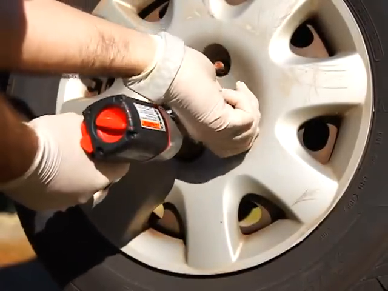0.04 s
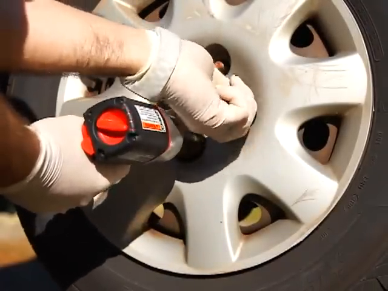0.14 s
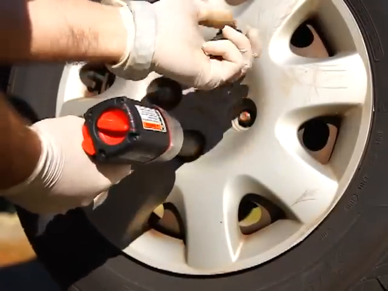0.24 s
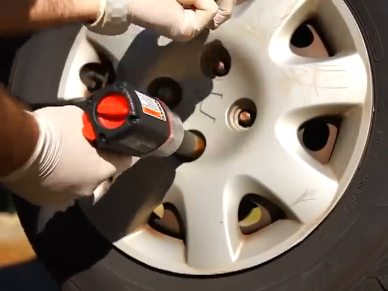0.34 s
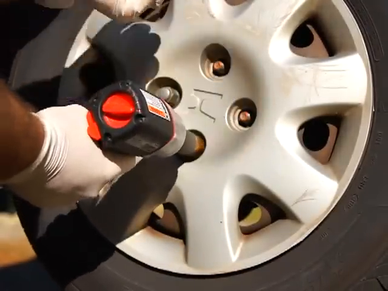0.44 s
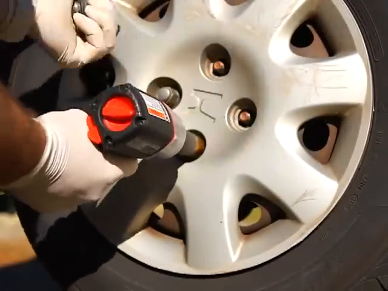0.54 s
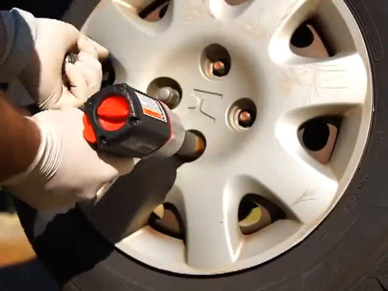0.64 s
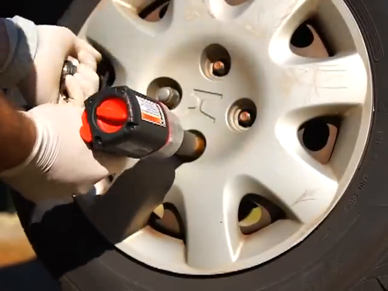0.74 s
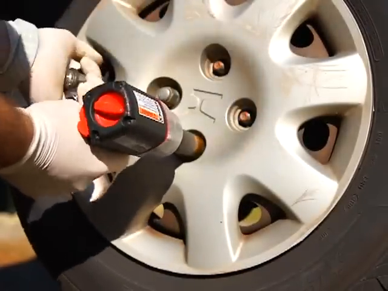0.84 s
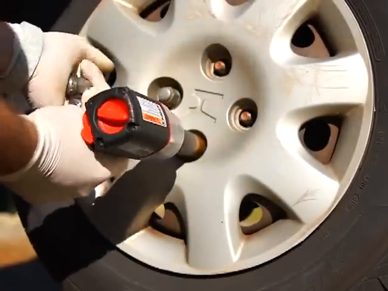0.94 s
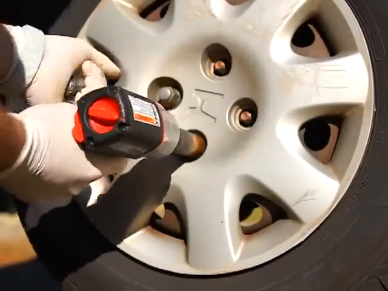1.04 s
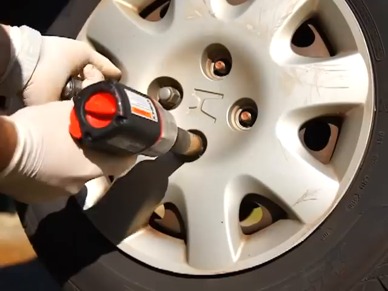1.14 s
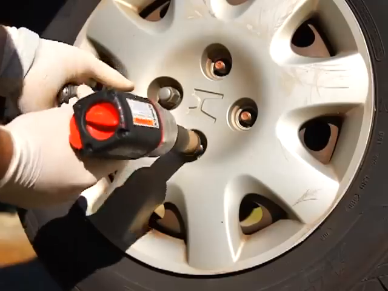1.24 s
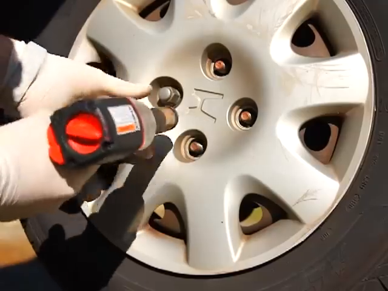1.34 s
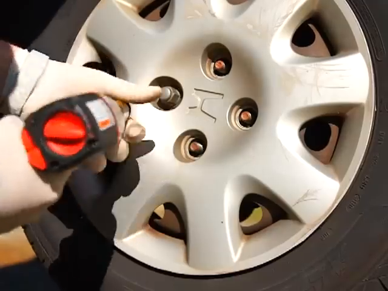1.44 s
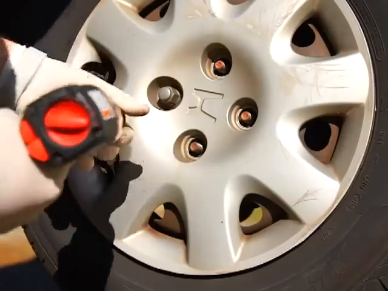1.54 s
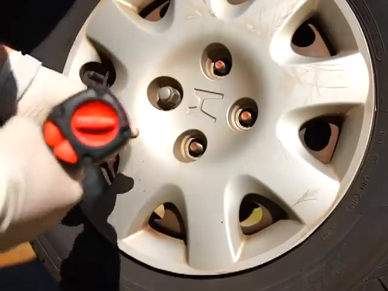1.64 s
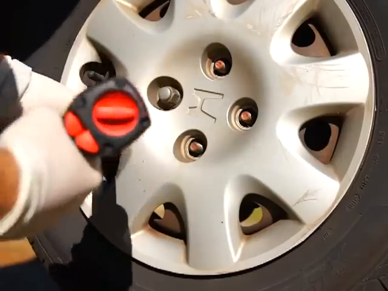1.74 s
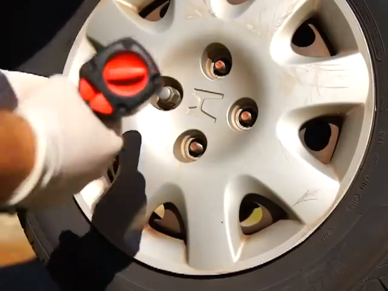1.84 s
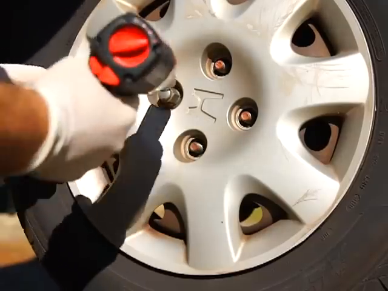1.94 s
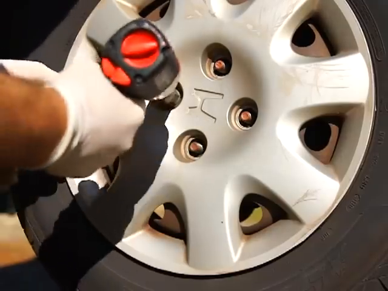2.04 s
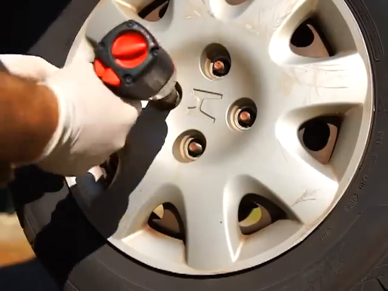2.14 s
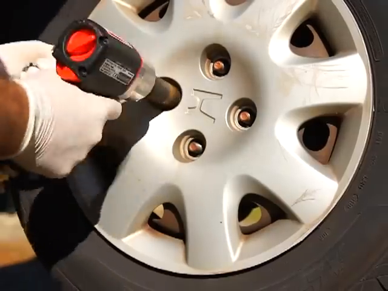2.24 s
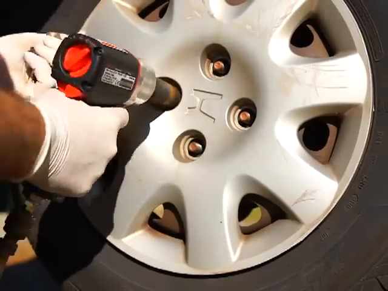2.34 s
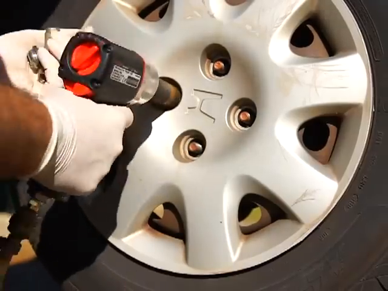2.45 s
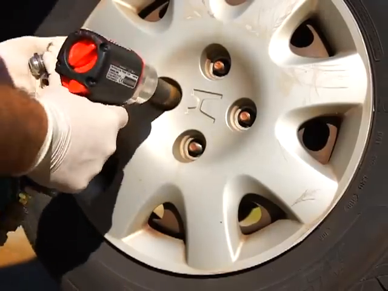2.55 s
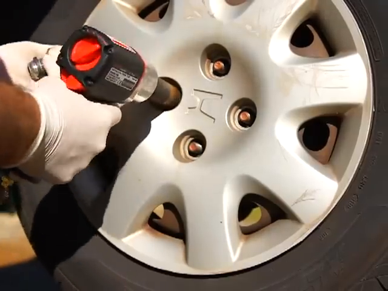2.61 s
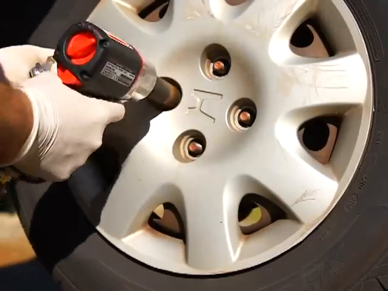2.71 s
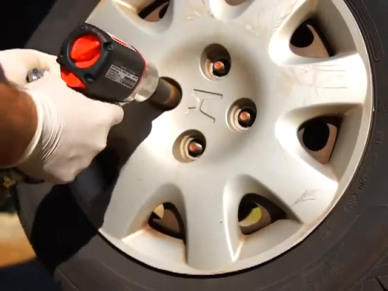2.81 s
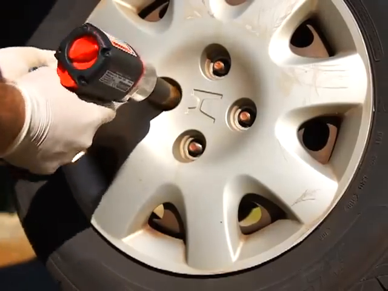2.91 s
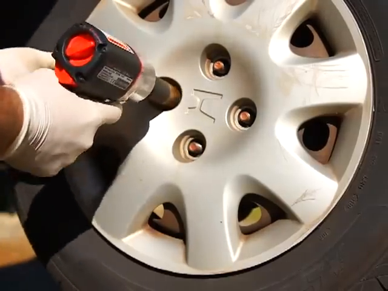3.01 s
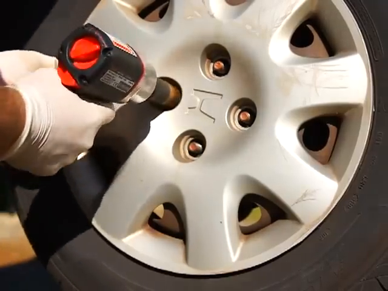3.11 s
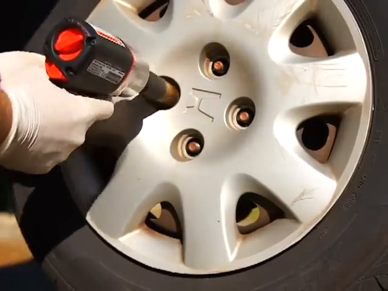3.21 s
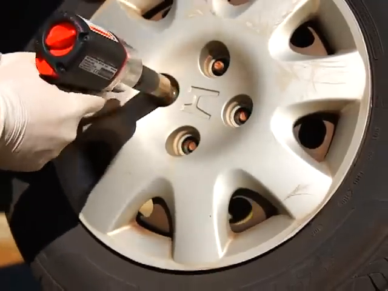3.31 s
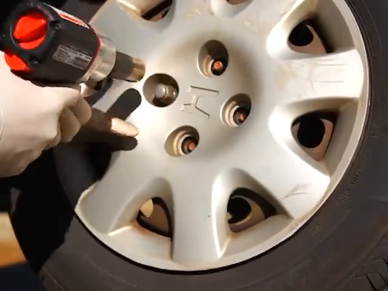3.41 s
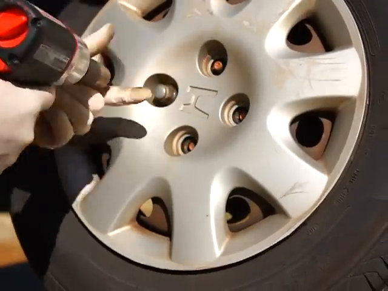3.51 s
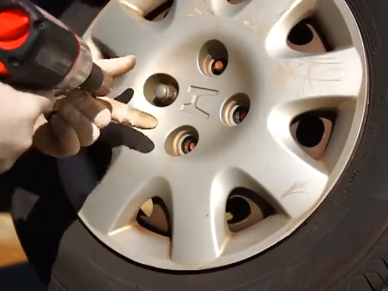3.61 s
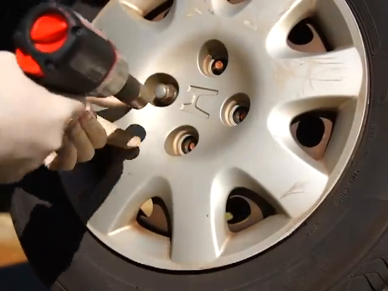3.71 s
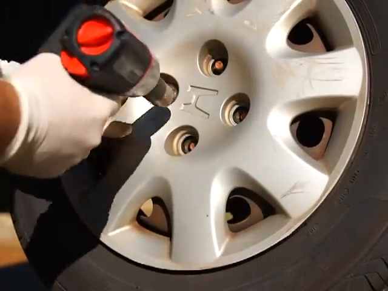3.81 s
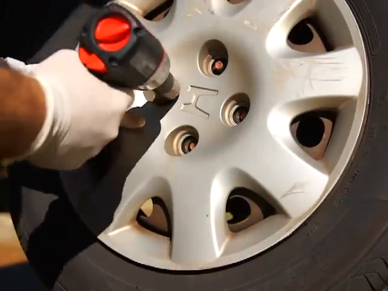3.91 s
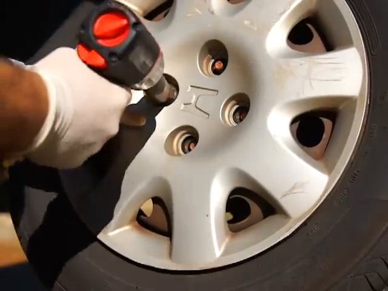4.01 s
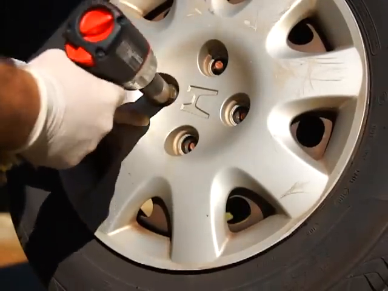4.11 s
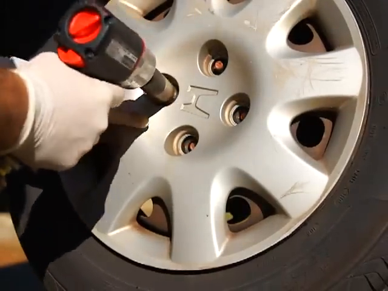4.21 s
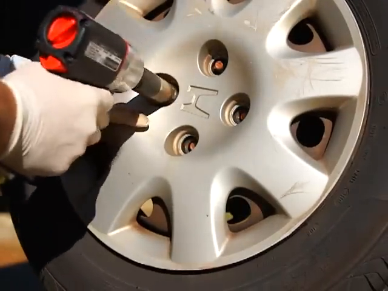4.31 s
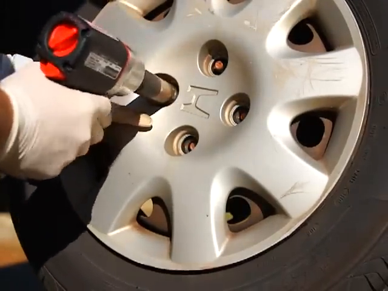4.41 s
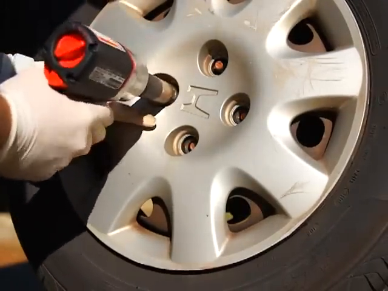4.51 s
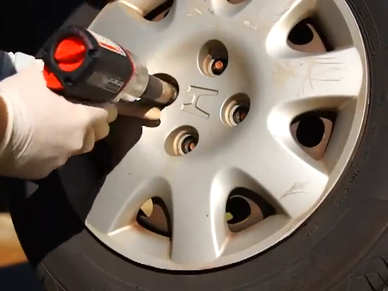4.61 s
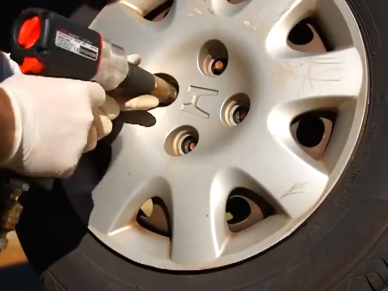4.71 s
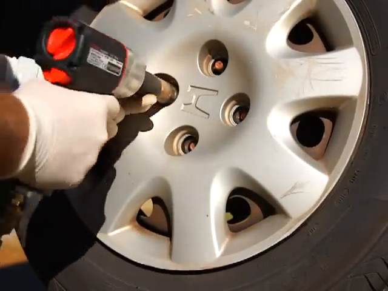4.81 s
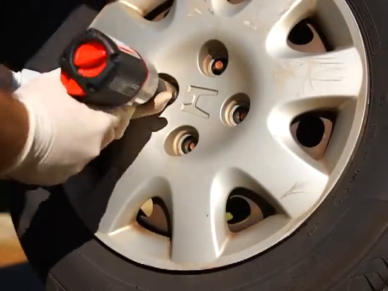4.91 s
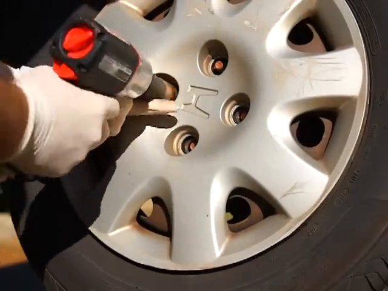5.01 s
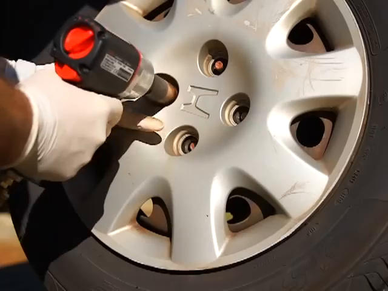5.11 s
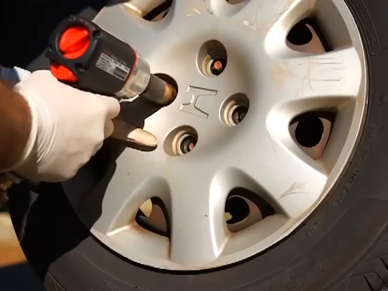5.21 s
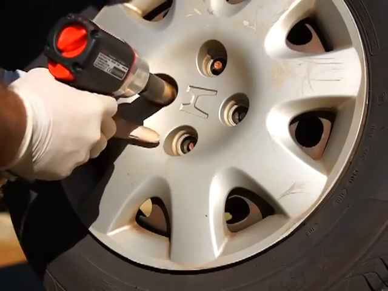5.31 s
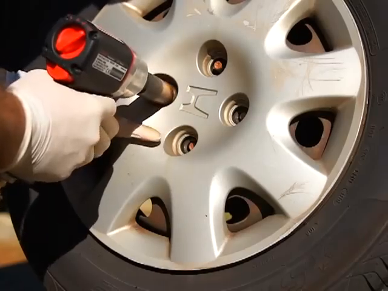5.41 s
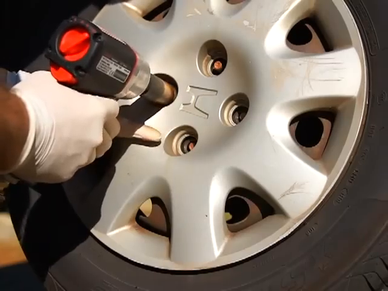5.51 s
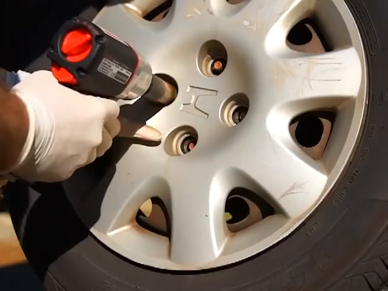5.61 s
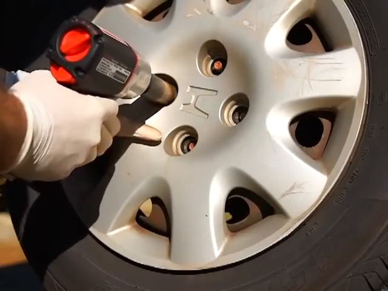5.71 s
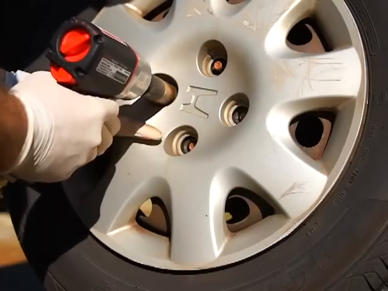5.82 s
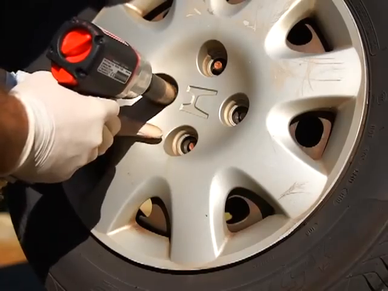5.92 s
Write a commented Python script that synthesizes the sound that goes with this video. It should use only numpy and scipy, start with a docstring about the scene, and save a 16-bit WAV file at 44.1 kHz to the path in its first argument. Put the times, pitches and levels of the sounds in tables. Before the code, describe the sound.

A few light metal clinks open the sound, close up in a garage with a slight echo. At about 0.8 seconds an air impact wrench hammers at a wheel nut in two short, rattling bursts with puffs of exhaust, then runs down with a falling whine until about 1.6 seconds. The socket and loose nuts clink, knock and scrape against the wheel from 1.3 to 2.5 seconds. Three more loud, quick bursts come between 2.6 and 3.3 seconds, the last with a brief rising whine. A tiny squeak follows near 3.4 seconds, then scattered lighter clicks, ringing taps and faint rubbing as the socket is fitted again. Air hisses softly at the trigger around 4.5 seconds and again from 5.3 seconds, growing louder. At about 5.7 seconds the wrench gives one brief, weaker blip with a couple of blows, followed by a few clinks.

```python
"""A few light clinks, then an air wrench hammers at wheel nuts in short, rattling bursts.
Its vane motor puffs out air, stalls under the hammer blows and runs down with a falling whine.
Between bursts the socket and nuts knock and scrape on the wheel, and air hisses at the valve.
It is all heard in a garage, through a small camera whose housing weakens a few narrow pitch bands."""
import sys
import numpy as np
from scipy import signal
from scipy.fft import rfft, irfft, next_fast_len
from scipy.io import wavfile
from scipy.ndimage import uniform_filter1d, map_coordinates

SR = 44100
rng = np.random.default_rng(int(sys.argv[2]) if len(sys.argv) > 2 else 0)


def put_to_file(sound):
    """Save the sound as 16-bit audio at rate SR, in the file named by the first command-line argument."""
    columns = np.atleast_2d(sound).T  # one column per channel
    safe = np.clip(columns, -1, 1)
    whole_steps = np.round(safe * 32767)
    wavfile.write(sys.argv[1], SR, whole_steps.astype(np.int16))


N = 262395

# The hammer hitting the anvil inside the wrench. Each row: start in seconds, level in dB.
BLOWS = [(0.7709, -8), (0.7922, -1), (0.807, -3), (0.8401, -3.5), (0.8735, -2), (0.9097, -1.5),
         (1.0218, -1.5), (1.0384, -3.5), (1.073, -12), (1.1038, -1), (2.6278, -2), (2.6582, 2), (2.6948, 1),
         (2.7286, 0), (2.7664, -0.5), (2.7974, -4.5), (2.9101, -12), (2.9257, 2), (2.9387, -3.5),
         (2.972, -2.5), (3.0082, 1), (3.174, -5.5), (3.1888, -0.5), (3.2289, -9.5), (3.263, -0.5),
         (5.686, -9), (5.7351, -0.5)]
# The wheel's ringing tones. Each row: pitch in Hz, level in dB, t60 (seconds to fade by 60 dB).
WHEEL_TONES = [(385, -3.5, 0.22), (834, -9.5, 0.16), (1032, -10.5, 0.17), (1674, -2, 0.116),
               (1855, -2, 0.057), (2647, -6.5, 0.21), (2840, -11.5, 0.016), (3044, -20.5, 0.084),
               (3450, 3, 0.3), (3970, -2.5, 0.046), (4230, 3, 0.085), (5330, -9, 0.15), (6083, -24, 0.07),
               (7500, -14, 0.036), (7540, -6, 0.017), (8160, -5, 0.013), (3310, -7.5, 0.314),
               (9250, -13.5, 0.1)]
# One list per free spin of the motor. Each row: time in seconds, vane rate in Hz, whine level in dB.
FREE_SPINS = [
    [(1.05, 390, -17.5), (1.08, 446.4, -14.5), (1.115, 609, -20), (1.16, 489.4, -20.5), (1.22, 390, -19),
     (1.3, 289, -27), (1.38, 217, -27), (1.46, 155.4, -31), (1.56, 110.8, -44.5)],
    [(3.19, 370, -29.5), (3.21, 408, -16.5), (3.24, 500, -21.5), (3.285, 620, -28)],
]


def impacts():
    """Hard, bright hammer blows, and knocks of the socket and nuts that each add a small ping."""
    # Each row: start in seconds, treble level in dB, middle and thud in dB over the treble,
    # t60 in seconds, ping pitch in Hz, ping strength in dB.
    knocks = [(0.1018, -42, 5, -11, 0.076, 1760, -5.5), (0.39, -20, -22, -34, 0.11, 4210, -3),
              (0.4219, -17, -21.5, -25, 0.065, 4190, -4.5), (0.4678, -17, -18, -26, 0.025, 5200, -5),
              (0.617, -38.5, -17, -26, 0.052, 3130, 3.5), (1.3014, -12, -14, -18, 0.073, 5330, -1.5),
              (1.3535, -16.5, -9, -16, 0.07, 4227, -3), (1.3823, -15.5, -9, -18, 0.07, 1662, -3),
              (1.4129, -14, -5, -18, 0.061, 4030, 0), (1.4461, -20, -4.5, -22, 0.065, 5300, 0.5),
              (1.515, -14, -16.5, -33, 0.21, 4350, -1.5), (1.5567, -3, -12.5, -31, 0.044, 4640, -9.5),
              (1.5973, -17.5, -12, -34, 0.039, 1895, -2), (1.6375, -23.5, -13.5, -32, 0.054, 1560, -2),
              (1.6527, -17.5, -18, -39, 0.05, 4720, 0), (1.6912, -15.5, -15.5, -40, 0.048, 1633, -2.5),
              (1.7508, -26.5, -25, -39, 0.057, 5480, -2), (2.104, -25, -14, -37, 0.14, 1885, -6),
              (2.1506, -7, -8.5, -21, 0.16, 2710, 3), (2.1946, -10.5, -11, -17.5, 0.11, 2600, 0.5),
              (2.3016, -31.5, -8, -8, 0.21, 4200, -8), (2.3381, -4.5, -6, -9.5, 0.054, 1570, -5),
              (2.4505, -31.5, -6, -7, 0.1, 3980, 0), (2.4643, -18, -9, -15, 0.045, 4120, -2),
              (2.5361, -55, 11.5, -3, 0.07, 2570, 5), (3.3282, -15, -15, -13, 0.12, 4100, -4),
              (3.3611, -14.5, -11, -13, 0.11, 4400, -2.5), (3.3965, -14, -6, -7, 0.14, 1500, -0.5),
              (3.4477, -26, -12, 6, 0.038, 1920, -0.5), (3.5943, -20, -12, -15, 0.066, 3910, -2.5),
              (3.6453, -32, 0, -11, 0.1, 1880, -2), (3.7742, -29, -17, -30, 0.039, 4340, -4),
              (3.8878, -16.5, -10, -24, 0.032, 1830, -0.5), (4.0191, -17, -3, -17, 0.074, 2860, 3),
              (4.1125, -11.5, -15.5, -31, 0.073, 2848, -3.5), (4.2057, -25.5, 1.5, -13, 0.21, 1900, -3),
              (4.2467, -21.5, -2, -5.5, 0.11, 2856, 4), (4.345, -40.5, 7, -21, 0.039, 1520, 6),
              (4.4933, -35, 1, 2, 0.036, 2640, 0.5), (4.6614, -43, 2.5, -6, 0.042, 1660, 3.5),
              (4.7648, -27.5, -4, -21.5, 0.098, 2850, -1), (4.841, -37, 1.5, 7, 0.11, 2840, -1),
              (4.8628, -32.5, -4, -5, 0.095, 3160, -0.5), (4.954, -38.5, 7, 14, 0.12, 1970, -7),
              (4.9762, -46.5, 12, 16, 0.083, 1820, -5), (5.0075, -19.5, -5, -15, 0.067, 3080, -1),
              (5.1313, -21, 1, -12, 0.11, 1583, -3.5), (5.1737, -29, -13, -35, 0.21, 3930, 3),
              (5.2716, -28.5, -6, -31, 0.062, 1786, 0), (5.3508, -30, -0.5, 1, 0.054, 2040, 2.5),
              (5.66, -19, -8, -7.5, 0.051, 2890, 0.5), (5.8008, -18, -17, -11, 0.093, 2980, 2),
              (5.8257, -12, -27, -28, 0.065, 4240, -3), (5.8472, -17.5, -10, -28, 0.13, 2920, -0.5),
              (5.8824, -20, -11, -15, 0.18, 2650, -0.5)]
    out, t = np.zeros(N + SR), np.arange(SR // 4) / SR
    for start, db in BLOWS:
        blow = strike(db - 5.5, db - 16, db - 30, t60=0.18, ring_db=-11, crack=5.6, rise_s=0.00034)
        out[round(start * SR):][:len(t)] += blow
    for start, db, middle_db, thud_db, t60, hz, ping_db in knocks:
        db += 5.5
        ping_gain = amp(db + max(middle_db, 0) + ping_db - 6.5 - 60 * t / 0.035)
        ping = ping_gain * (1 - np.exp(-t / 0.0014)) * np.sin(2 * np.pi * hz * t)
        knock = strike(db, db + middle_db - 2.5, db + thud_db - 10.5, t60,
                       ring_db=-19, crack=1.05, rise_s=0.00089)
        out[round(start * SR):][:len(t)] += knock + ping
    return out[:N]


def strike(treble_db, middle_db, thud_db, t60, ring_db, crack, rise_s):
    """Metal hits metal: a crack, an uneven rattle that dulls as it dies, and the wheel ringing."""
    t = np.arange(SR // 4) / SR
    ring = sum(amp(db + rng.normal(0, 3.5) - 60 * t / min(decay, 1.7 * t60))
               * np.sin(2 * np.pi * hz * rng.normal(1, .03) * t) for hz, db, decay in WHEEL_TONES)
    chatter = amp(3.5 * np.repeat(rng.standard_normal(len(t) // 105), 105))
    dull = uniform_filter1d(rng.standard_normal(len(t)), size=4) * chatter * amp(-60 * t / t60)
    bright_gain = 0.1 * chatter * amp(-60 * t / (.5 * t60)) + crack * amp(-60 * t / 0.014)
    bright = bright_gain * rng.standard_normal(len(t))
    hit = (amp(ring_db) * ring + 1.43 * dull + bright) * (1 - np.exp(-t / rise_s))
    colour = [(90, thud_db - 26.5), (190, thud_db - 1), (300, thud_db + 18.5), (500, thud_db + 16.5),
              (800, middle_db + 4.5), (2000, middle_db + 2),
              (2800, treble_db - 8.0), (6000, treble_db - 9), (11000, treble_db - 13.5)]
    gains = amp(along(colour, np.fft.rfftfreq(len(t), 1 / SR)))
    fade_out = np.cos(np.pi / 2 * t / t[-1]) ** 2
    return irfft(rfft(hit) * gains, len(t)) * fade_out


def motor():
    """Exhaust and casing roar swell as the rotor leaves a stall, and soften when it spins free."""
    # The tone of the exhaust and of the casing. Each row: frequency in Hz, level in dB.
    puff_colour = [(60, -27), (130, -59), (220, -10.5), (320, -4), (450, 0.5), (600, -7.5), (900, -9),
                   (2000, -36.5)]
    roar_colour = [(300, -37), (600, -6), (800, 2.5), (960, 2), (1070, 9), (1180, -2), (1300, -4),
                   (1800, -7), (2300, -16), (4000, -39)]
    puff, roar, jet = trigger_pulls()
    t = np.arange(N) / SR
    free = sum((t > spin[0][0]) & (t < spin[-1][0]) for spin in FREE_SPINS)
    free = uniform_filter1d(1. * free, SR // 50)
    blow_times = np.array(BLOWS)[:, 0]
    speed = rotor_speed(blow_times)
    vane_hz = 400 * speed ** .3 * (1 + .1 * wobble(40))
    vanes = np.sin(2 * np.pi * np.cumsum(vane_hz) / SR)
    buzz = vanes * amp(3 * wobble(60)) * (seconds_since(blow_times) < .04)
    exhaust = speed * (0.8 * hiss(puff_colour, 1.5, 50) + 0.83 * buzz)
    casing = 0.76 * speed ** 0.2 * hiss(roar_colour, 2.74, 60) * (1 + 0.39 * vanes)
    return amp(-11 * free) * puff * exhaust + amp(-3 * free) * roar * casing + air_jet(jet * speed ** 0.084)


def trigger_pulls():
    """Gains of puff, roar and jet: each pull rises, sags while held, then drops to a run-down."""
    # Each row: start and hold time in seconds, puff, roar and jet levels in dB,
    # run-down level in dB relative to the hold, its base fading speed in dB per second.
    pulls = [(-.1, 0.096, -14.5, -28.5, -42, -40, 100), (0.76, .155, -11, -14, -17, -10, 140),
             (1.006, .12, -11.5, -16, -20, -2, 59.5), (2.617, 0.16, -13, -19.5, -18, -13.5, 71),
             (2.898, 0.1, -8, -18, -19, -13.5, 69), (3.164, 0.13, -9, -13.5, -19, -15, 46.5),
             (5.653, 0.11, -21, -27, -45, -32, 100), (5.718, 0.087, -18, -20, -33.5, -17.5, -5)]
    # Level lost while held, in dB per second, for puff, roar and jet.
    sag_rates = [64, 4, 7.5]
    sag = np.array(sag_rates)[:, None]
    offset_db, fade_scale = np.array([[-5], [8], [-4]]), np.array([[0.75], [1.38], [0.49]])
    lead_s = np.array([[0], [0], [0.012]])  # air reaches the jet before the rotor turns
    attack_s, release_s, stop_s = 0.013, 0.011, .48
    t, out = np.arange(N) / SR, np.zeros((3, N))
    for start, held, *layers_db, down_db, fade_rate in pulls:
        on, off = np.clip(t - start, 0, held), np.maximum(t - start - held, 0)
        rise = np.clip((t - start + lead_s) / (attack_s + lead_s), 0, 1) ** 2
        cut = np.exp(-off / release_s)
        stop = np.clip((stop_s - off) / release_s, 0, 1)
        rundown = amp(down_db + offset_db - fade_scale * fade_rate * off) * stop
        out += amp(np.array(layers_db)[:, None] - sag * on) * rise * (cut + (1 - cut) * rundown)
    return out


def rotor_speed(blow_times):
    """Share of full speed: blows stall the rotor, but the first of a burst only takes up slack."""
    stall_depth, stall_s = .93, .016
    stalls = blow_times[1:][np.diff(blow_times) < .1]
    return 1 - stall_depth * np.exp(-(seconds_since(stalls) / stall_s) ** 4)


def air_jet(gain):
    """Rushing air brightens as it grows, and loose metal buzzes against the wheel and rings it."""
    # The tone of the jet and of its high fizz. Each row: frequency in Hz, level in dB.
    jet_colour = [(1000, -28), (2200, 12.5), (2900, 11.5), (3500, 11), (4200, 12), (6000, 7.5), (7500, 1.5),
                  (9000, -60)]
    fizz_colour = [(5000, -33), (7000, -7), (8000, 6), (10000, 0.5), (11500, -14.5)]
    spikes = rng.standard_normal(N) * amp(6 * wobble(900))
    buzz = filtered(spikes, lambda hz: sum(
        amp(db) * 1j * hz / t60 / (pitch ** 2 - hz ** 2 + 3j * hz / t60)  # one resonance
        for pitch, db, t60 in WHEEL_TONES if 1400 < pitch < 6500))
    rush = hiss(jet_colour, 2.85, 160) + .5 * unit(buzz)
    return gain * rush + 2.78 * gain ** 1.68 * hiss(fizz_colour, 4.8, 70)


def whine():
    """The freely spinning vanes make an unsteady tone with overtones, heard through the muffler."""
    # What the muffler lets through. Each row: frequency in Hz, gain in dB.
    muffler = [(110, -41.5), (190, -28), (270, -6.5), (500, -8.5), (780, -7), (950, 9), (1070, 11),
               (1220, 0), (1900, -10), (2500, -16.5), (4000, -39)]
    t, out = np.arange(N) / SR, np.zeros(N)
    for times, hz, db in map(np.transpose, FREE_SPINS):
        phase = 2 * np.pi * np.cumsum(np.interp(t, times, hz) * (1 + .012 * wobble(80))) / SR
        tone = sum(amp(-.5 * k + 7 * (k == 1) + 2.5 * wobble(70))  # the lowest tone stands out
                   * np.sin(k * phase + rng.uniform(0, 2 * np.pi)) for k in range(1, 17))
        out += amp(np.interp(t, times, db, -150, -150)) * tone
    return coloured(out, muffler)


def squeaks():
    """Brief wavering tones, perhaps a nut squeaking on its thread and the wheel cover humming."""
    # Each row: start in seconds, length in seconds, pitch in Hz, level in dB.
    tones = [(2.386, 0.32, 378.6, -48), (3.413, 0.033, 1075, -16), (3.472, 0.024, 1056, -19.5),
             (3.525, 0.34, 244.4, -43.5), (5.104, 0.093, 237, -43), (5.857, 0.13, 387, -32.5)]
    t, out = np.arange(N) / SR, np.zeros(N)
    for start, length, hz, db in tones:
        swell = np.sin(np.pi * np.clip((t - start) / length, 0, 1)) ** 2
        gain = amp(db + 1.5 * wobble(30)) * swell
        out += gain * np.sin(2 * np.pi * hz * np.cumsum(1 + 0.0119 * wobble(40)) / SR)
    return out


def rubbing():
    """Hands and socket rub with a low, grainy scrape and a higher grit."""
    # One list per stretch of rubbing. Each row: time in seconds, scrape level in dB, grit level in dB.
    stretches = [
        [(0.0, -51, -56), (0.16, -59, -62.5), (0.314, -54.5, -59), (0.75, -55.5, -62)],
        [(1.56, -49, -45), (1.716, -55.5, -63.5), (1.976, -52.5, -55), (2.168, -59, -67), (2.3, -40, -37),
         (2.424, -43.5, -49), (2.62, -51, -58.5)],
        [(3.7, -45, -56), (3.842, -54.5, -61.5), (4.244, -49, -53), (4.584, -54, -62), (5.076, -47, -57),
         (5.242, -46, -46.5), (5.4, -45, -47.5)],
    ]
    # The tone of the scrape and of the grit. Each row: frequency in Hz, level in dB.
    scrape_colour = [(60, 0), (150, -8.5), (260, -2), (450, 0), (1000, -1), (1800, -10.5), (2500, -21),
                     (5000, -71)]
    grit_colour = [(1500, -12), (2600, -6.5), (4500, -6.5), (6500, -15.5), (8000, -44), (11000, -61)]
    t, gains = np.arange(N) / SR, np.zeros((2, N))
    for times, *levels in map(np.transpose, stretches):
        gains += amp([np.interp(t, times, db, -150, -150) for db in levels])
    scrape, grit = uniform_filter1d(gains, SR // 250, axis=1)
    return scrape * hiss(scrape_colour, 4.7, 40) + grit * hiss(grit_colour, 2.4, 81)


def valve_leak():
    """Air slips past the half-pressed trigger with a hollow hiss."""
    # Each row: start in seconds, length in seconds, first level in dB, last level in dB.
    leaks = [(4.454, .2, -47.5, -52), (5.297, .4, -45, -43), (5.6, .45, -37, -36)]
    # The tone of the leak. Each row: frequency in Hz, level in dB.
    leak_colour = [(500, -13.5), (1040, -1.5), (1400, -17), (1720, -1), (2200, -7.5), (2780, 6.5),
                   (3400, -13), (4250, 0.5), (5200, -13), (6130, -3.5), (7500, -15.5), (8950, -5.5),
                   (10500, -17), (11500, -42)]
    t, gain, edge_s = np.arange(N) / SR, np.zeros(N), 0.021
    for start, length, *db in leaks:
        edges = np.clip(np.minimum(t - start, start + length - t) / edge_s, 0, 1) ** 2
        gain += amp(np.interp(t, [start, start + length], db)) * edges
    return gain * hiss(leak_colour, 0.97, 100)


def wall_echo(sound):
    """The walls send the sound back; high pitches die away first."""
    # Each row: frequency in Hz, t60 in seconds.
    fade_times = [(200, 0.37), (2000, 0.17), (10000, 0.071)]
    hz, t, noise = signal.stft(rng.standard_normal(int(.4 * SR)), SR, nperseg=128)
    tail = signal.istft(noise * amp(-60 * t / along(fade_times, hz)[:, None]), SR, nperseg=128)[1]
    return signal.fftconvolve(sound, tail / np.linalg.norm(tail))[:N]


def garage_noise():
    """The room's nearly steady rumble and hiss."""
    # Each row: frequency in Hz, level in dB.
    room_colour = [(20, 26), (60, 5.5), (150, -29), (270, -8.5), (1000, 2.5), (4000, -21.5), (8000, -14.5),
                   (11000, -32)]
    return hiss(room_colour, flutter_db=0.51, rate=23)


def near_reflections(sound):
    """Nearby reflections shift as hands and tool move, so left and right differ, most in the treble."""
    # Stereo width. Each row: frequency in Hz, side level in dB relative to the centre.
    width = [(60, -34), (140, -36.5), (350, -16), (840, -6.5), (2010, -3), (4840, 0), (11600, -3.5)]
    bands = signal.stft(sound, nperseg=256)[2]
    drift = uniform_filter1d(rng.standard_normal(bands.shape), 3, axis=0)
    drift = uniform_filter1d(drift, 24, axis=1)
    shifted = signal.istft(bands * np.exp(1j * 1.72 * unit(drift)), nperseg=256)[1][:N]
    return coloured(shifted, width)


def seconds_since(times):
    """Seconds since the latest of these events."""
    t, times = np.arange(N) / SR, np.append(-1, times)
    return t - times[np.searchsorted(times, t) - 1]


def amp(db):
    """Turn dB into a gain."""
    return 10 ** (np.asarray(db) / 20)


def unit(x):
    """Scale to an average (rms) level of 1."""
    return x / np.sqrt(np.mean(x ** 2) + 1e-20)


def along(points, hz):
    """Read between (Hz, value) points on a log frequency axis."""
    freqs, values = np.transpose(points)
    return np.interp(np.log(hz + 1), np.log(freqs + 1), values)


def wobble(rate):
    """A smooth curve through `rate` random points a second."""
    return map_coordinates(rng.standard_normal(int(N * rate / SR) + 4), [np.arange(N) * rate / SR])


def filtered(x, response):
    """Scale each frequency by response(hz)."""
    size = next_fast_len(N + SR // 2)
    return irfft(rfft(x, size) * response(np.fft.rfftfreq(size, 1 / SR)), size)[..., :N]


def coloured(x, colour):
    """Shape the tone with (Hz, dB) points."""
    return filtered(x, lambda hz: amp(along(colour, hz)))


def hiss(colour, flutter_db, rate):
    """Shaped noise whose level flutters at random."""
    return unit(coloured(rng.standard_normal(N) * amp(flutter_db * wobble(rate)), colour))


def scene():
    """The wrench and the work on the wheel, in the garage, in stereo."""
    # Each row: frequency in Hz, left level minus right level in dB.
    balance = [(60, -4), (220, 0.5), (840, -1.5), (3120, -1.5), (11600, -2)]
    near = motor() + whine() + squeaks() + impacts() + rubbing() + valve_leak()
    mid = near + amp(-11.5) * wall_echo(near) + amp(-49) * garage_noise()
    side = near_reflections(mid)
    return filtered(np.array([mid + side, mid - side]), lambda hz: amp(along(balance, hz) * [[.5], [-.5]]))


def record(dry):
    """The camera: its housing cuts notches, loud peaks are rounded off, and bass and top are trimmed."""
    # The housing's notches. Each row: centre in Hz, half width in Hz, depth in dB.
    notches = [(620, 73, -8.5), (1369, 123, -10), (2373, 133, -11), (3446, 156, -9)]
    # The microphone's tone and the final trim. Each row: frequency in Hz, gain in dB.
    microphone = [(40, -7.5), (100, 0.5), (180, 1.5), (280, 0.5), (8000, -1.5), (10000, -5.5)]
    trim = [(30, -9), (100, -9.5), (200, 1), (10000, 0), (10900, -4), (11200, -25), (12200, -51)]
    top_hz, converter_bias = 12250, -0.0022

    def housing_db(hz):
        return sum(db * np.exp(-((hz - centre) / width) ** 2) for centre, width, db in notches)

    heard = filtered(dry, lambda hz: amp(housing_db(hz) + along(microphone, hz)))
    rounded = heard / (1 + np.abs(heard) ** 6) ** (1 / 6)
    return filtered(rounded, lambda hz: amp(along(trim, hz)) * (hz < top_hz)) + converter_bias


dry = scene()
out = record(dry)
put_to_file(out)
```